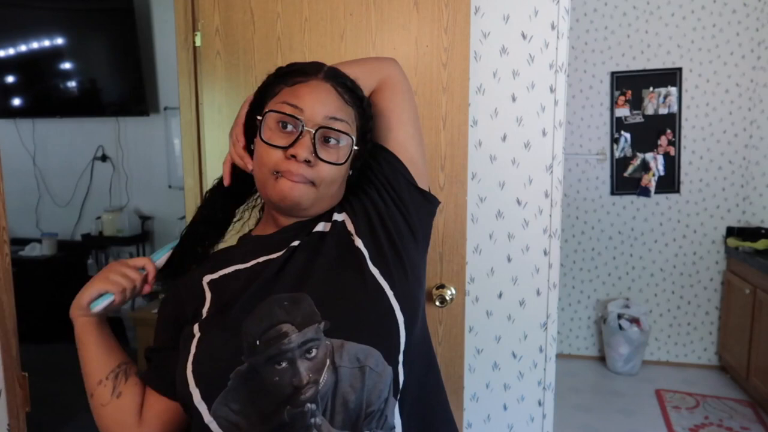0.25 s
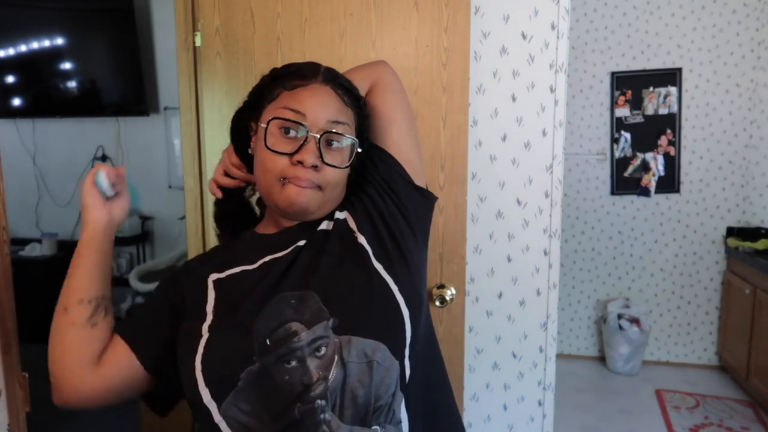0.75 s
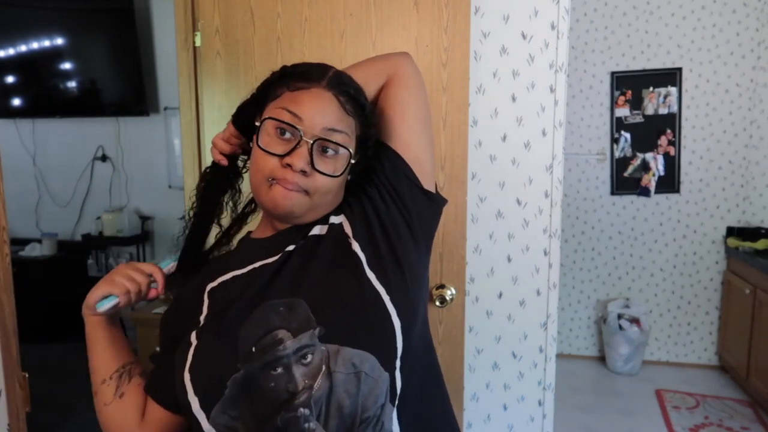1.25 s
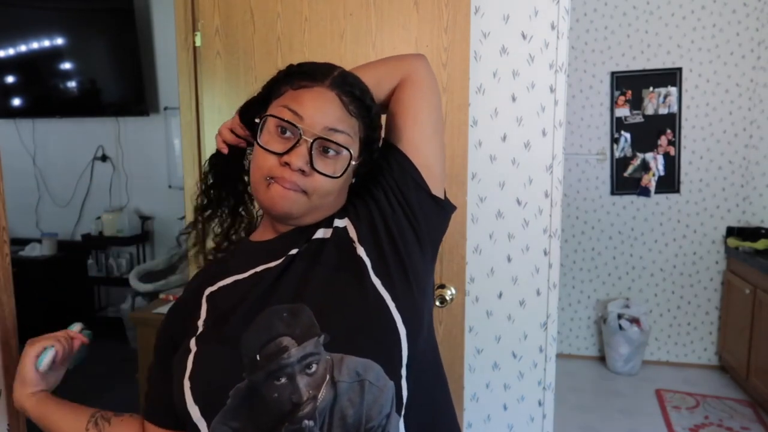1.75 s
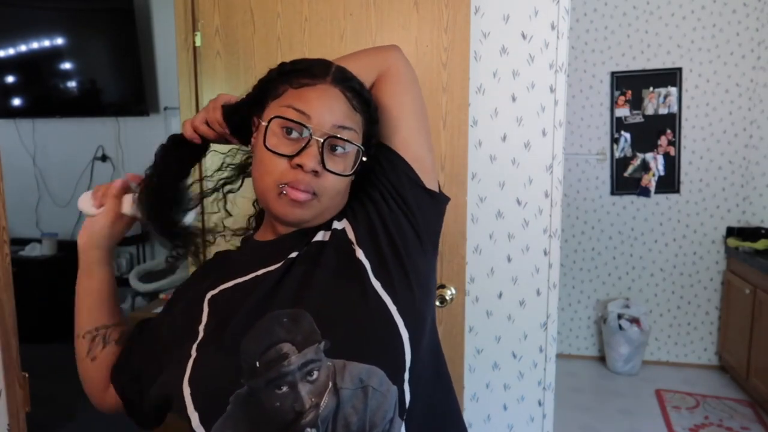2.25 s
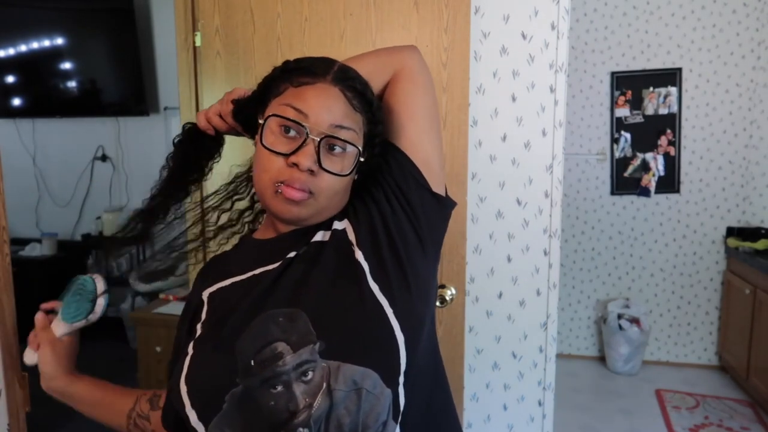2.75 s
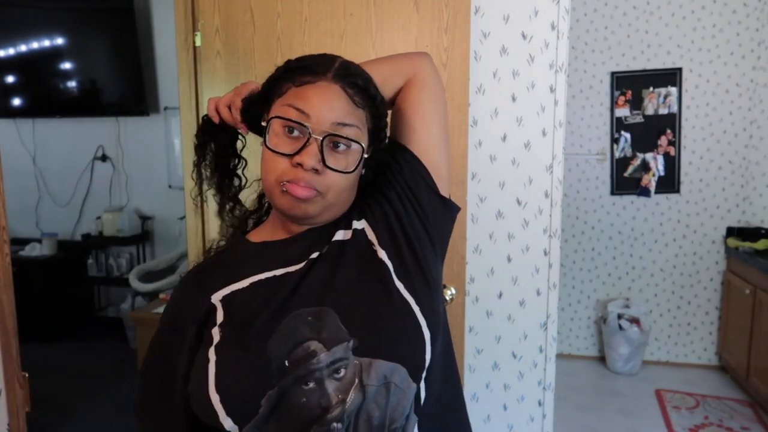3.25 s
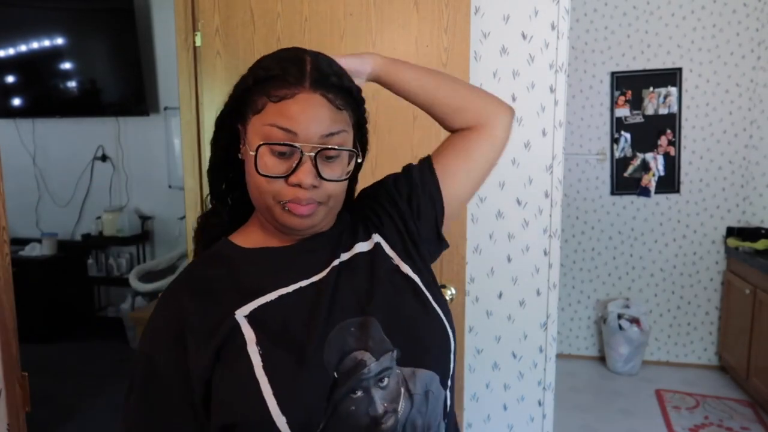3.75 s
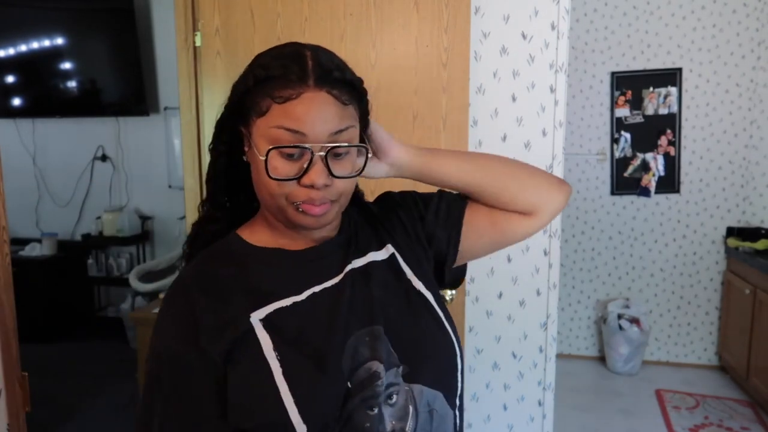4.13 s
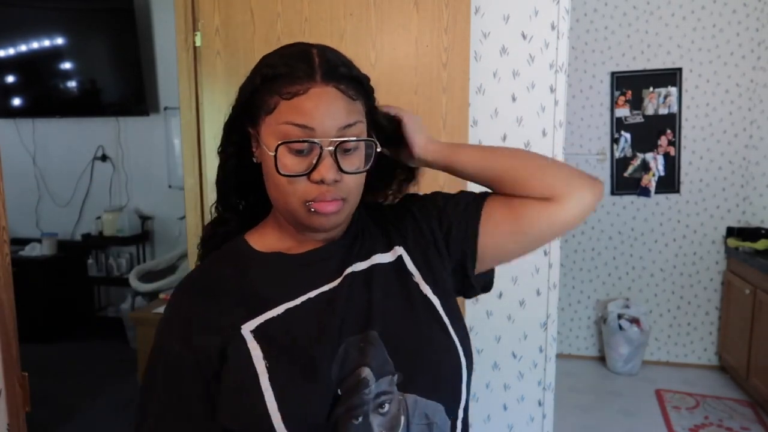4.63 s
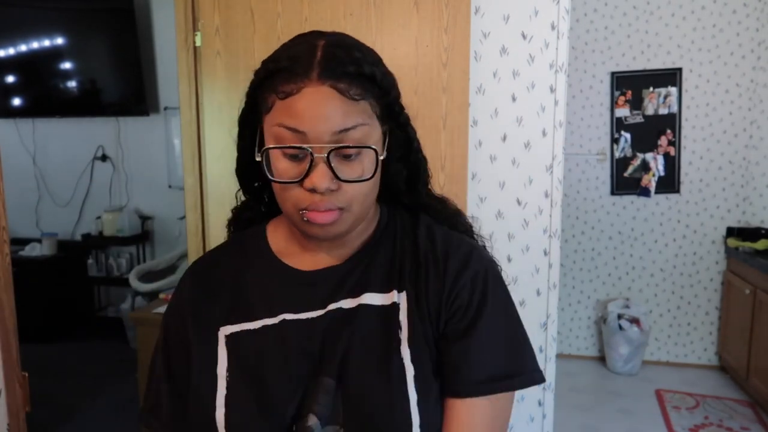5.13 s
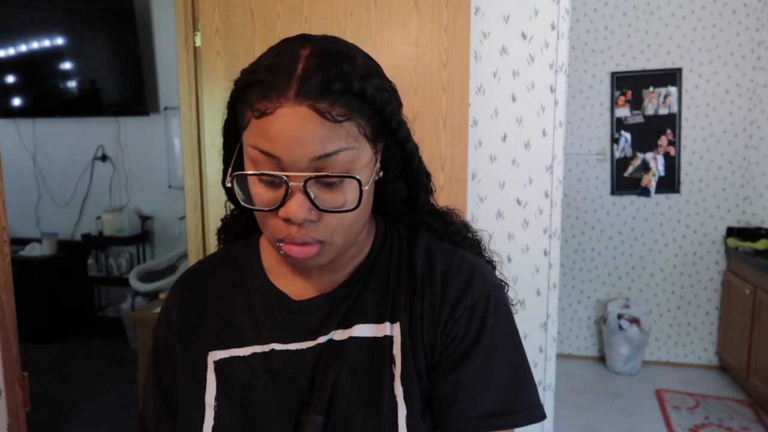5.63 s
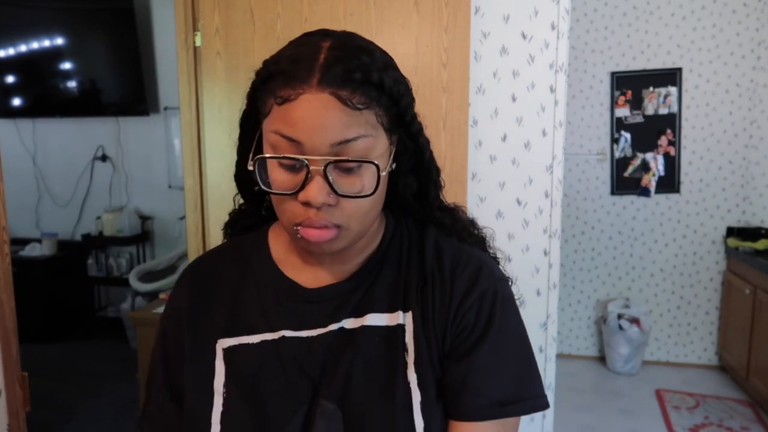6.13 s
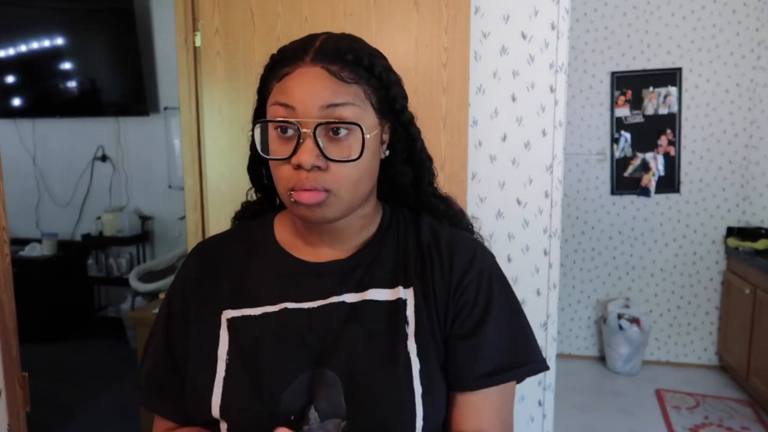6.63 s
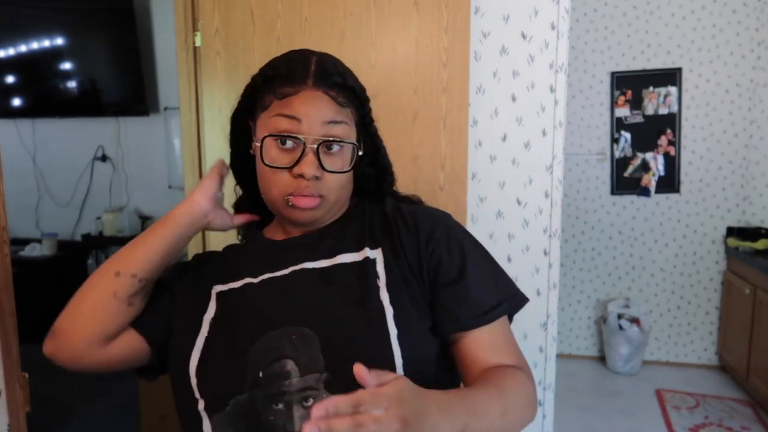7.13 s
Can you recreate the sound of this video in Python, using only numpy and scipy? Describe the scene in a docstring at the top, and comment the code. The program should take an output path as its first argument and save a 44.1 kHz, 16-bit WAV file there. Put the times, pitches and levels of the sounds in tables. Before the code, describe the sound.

Close by in a small home room, a paddle brush makes three scratchy, hollow strokes through long hair, ticking and snagging on tangles. Fingers smooth the hair almost silently, then the brush clacks loudly on a counter. A bottle bumps, sputters out cream, snaps shut and is set down. Palms rub with faint squeaks. A low appliance hum throbs throughout.

```python
"""Hair brushing and a cream bottle.

A paddle brush strokes long hair three times, tugging at tangles (slip noise, bristle pings, ticks); fingers smooth it.
The brush clacks onto a counter (damped modes, noise bursts). A bottle bumps, sputters cream, snaps shut and lands.
Palms rub (slip noise) and squeak (pitch glides). An appliance hums and throbs throughout (beating sines, noise).
"""
import sys
import numpy as np
from scipy import signal
from scipy.fft import rfft, irfft, next_fast_len
from scipy.io import wavfile
from scipy.ndimage import map_coordinates

SR = 44100
rng = np.random.default_rng(int(sys.argv[2]) if len(sys.argv) > 2 else 0)


def output_pcm(signal):
    """Save a mono or channel-first signal as 16-bit PCM at the path in sys.argv[1].

    Samples are clipped to [-1, 1] before scaling.
    """
    pcm = np.clip(np.atleast_2d(signal).T, -1, 1) * 32767
    wavfile.write(sys.argv[1], SR, np.round(pcm).astype(np.int16))


N = 325887

# Table levels are relative; the source functions add trims.
# brush glides down the hair: start_s, length_s, bristle_db, paddle_db
STROKES = [(0, 0.46, -52, -53.5), (.975, 0.71, -51.5, -50.5), (2.325, 0.53, -57, -57)]
# bristles catch in a tangle and tug through it: start_s, length_s, bristle_db, paddle_db
TUGS = [(0, 0.015, -46, -34.5), (.085, 0.095, -47.5, -43.5), (.325, 0.031, -48, -64),
        (.38, 0.019, -43.5, -42.5), (.412, 0.056, -51, -47.5), (.975, .01, -50, -53),
        (1.225, 0.08, -46, -54), (1.345, 0.013, -47, -44), (1.372, 0.043, -44, -45),
        (1.428, 0.061, -48, -44), (2.338, 0.014, -40.5, -46), (2.38, 0.048, -46.5, -37),
        (2.445, 0.058, -48.5, -42.5), (2.66, .006, -55, -65), (2.703, 0.01, -50, -51),
        (2.753, 0.029, -44.5, -40), (2.815, .02, -62, -58)]
# bristles scraping over strands: freq_hz, level_db
BRISTLE_SPECTRUM = [(820, -21), (1400, -8), (1560, -7), (1760, -2), (1940, -4), (2250, -1), (2980, -9.5),
                    (3670, -6), (4560, -11), (6080, -12), (8690, -17), (9410, -17.5), (12500, -17),
                    (14300, -31), (15000, -69)]
# hollow paddle: freq_hz, level_db
PADDLE_SPECTRUM = [(180, -32), (300, -3.5), (327, -9), (376, -12), (438, 3), (536, -3), (671, 4.5),
                   (866, -7), (1070, 0.5), (1390, -11), (1700, -10), (2210, -45), (3740, -120)]
# rise and fall times are per 20 dB; strands thin out toward the ends, tangles loosen
GLIDE_RISE_S, GLIDE_FALL_S, GLIDE_SAG_DB_PER_S = 0.072, 0.069, 10
TUG_RISE_S, TUG_FALL_S, TUG_SAG_DB_PER_S = 0.047, 0.036, 32
# single bristles spring free; spread is a fraction of pitch, level is beside the scrape
PING_HZ, PING_SPREAD, PINGS_PER_S, PING_T60_S, PING_DB = 2874, 0.17, 330, 0.017, -7.5
# small ticks of bristles in the hair, later of bottle and hands: start_s, level_db, pitch_hz, knock_db, knock_hz
TICKS = [(0.321, -46, 3020, -22, 700), (0.365, -38.5, 2820, -1, 983), (0.384, -30, 3020, -11, 1450),
         (0.397, -35, 3400, -8, 1000), (0.97, -46, 2620, -8, 704), (1.219, -41, 2600, -20, 700),
         (1.2846, -35, 1970, -6, 700), (1.3749, -33, 2310, -7, 756), (1.3958, -31, 2930, -12, 705),
         (1.4575, -34.5, 3130, -12, 760), (1.677, -41, 2440, -17, 700), (2.331, -30.5, 2900, -3, 713),
         (2.375, -31, 2430, -3, 980), (2.412, -35, 2700, 5, 1103), (2.4389, -30.5, 2860, -16, 1090),
         (2.6998, -31.5, 2300, -17, 705), (2.75, -33, 2510, 0, 1035), (2.765, -31, 2620, 1.5, 984),
         (2.95, -40.5, 3220, -6, 700), (4.791, -41, 1680, -4, 1130), (5.027, -44, 3230, -7, 960),
         (5.685, -41, 2660, -16, 700), (5.786, -35, 1960, -15, 800), (5.858, -32, 2250, 2, 830),
         (6.527, -46, 2570, -14, 700), (6.544, -41, 2010, -7, 690), (6.8073, -36.5, 2140, -3.5, 690)]
# brush slaps into the hair: start_s, level_db
SLAPS = [(0.001, -28.5), (0.025, -34.5)]
# brush cushion modes: freq_hz, level_db, t60_s
CUSHION_MODES = [(638, -5, 0.21), (770, 2.5, 0.088), (842, 3, 0.082), (996, -11.5, 0.15), (2010, -8, 0.069),
                 (2452, -3.5, 0.058), (2900, -31, 0.034)]
# fingers smooth the hair: start_s, length_s, level_db
SMOOTHING = [(3.2, 0.58, -68.5), (3.99, 0.081, -62), (4.32, .03, -61), (4.795, .03, -63)]
# strands rustling: freq_hz, level_db
STRAND_SPECTRUM = [(500, -14), (1200, -4), (1600, -6), (2150, 7), (2800, -10), (4500, -12), (7000, -24),
                   (12000, -40)]

# brush lands on the counter and settles: start_s, level_db
CLACKS = [(4.4255, -5.5), (4.4371, -20)]
# brush handle modes: freq_hz, level_db, t60_s
HANDLE_MODES = [(326, -27, 0.035), (490, -18, 0.023), (630, -1.5, 0.02), (879, 6, 0.017), (958, 10, 0.02),
                (1203, 2.5, 0.016), (1710, -2, 0.018), (2430, -10, 0.014), (2817, -1, 0.016),
                (3150, -12, 0.014), (3840, -18, 0.025), (4730, -18, 0.012)]
# counter board modes: freq_hz, level_db, t60_s
COUNTER_MODES = [(205, -17, .4), (262, -15, .3), (316, -10, .33), (398, -5, .25), (443, -5, .47),
                 (478, -12, .3), (576, -13, .27), (643, -14, .25), (785, -7, .24), (816, -8, .22),
                 (873, -11, .24), (918, -3.5, .39), (942, -1.5, .34), (981, -6.5, .28), (1014, -4, .26),
                 (1047, -12, .4), (1086, -6, .26), (1176, -13, .24), (1260, -14, .17), (1324, -14, .27),
                 (1782, -22, .3), (2223, -16, .24), (2659, -16, .27), (2825, -12, .22), (2929, -16, .3),
                 (3413, -21, .21), (3779, -22, .16)]
# counter's dense ring: freq_hz, level_db
SHUDDER_SPECTRUM = [(88, -54), (150, -21), (195, -13), (340, -2), (438, -4), (504, -8), (610, -7.5),
                    (704, -8), (933, 0), (1200, -8.5), (1500, -15), (2090, -16), (2410, -18), (2850, -19),
                    (3500, -26), (4300, -35), (5700, -31), (10000, -57), (13000, -101), (22000, -120)]
# thin metal part on the counter is jolted: start_s, level_db
RATTLES = [(4.4255, -43), (4.467, -48), (4.542, -57)]
# metal part modes: freq_hz, level_db, t60_s
METAL_MODES = [(5440, 1, 0.13), (5750, -3, .11), (5722, -8, .09)]
# contact noise of soft surfaces: freq_hz, level_db
SOFT_CONTACT = [(100, -23), (300, 5), (3000, 3.5), (4500, -11), (7000, -16.5), (13000, -30)]
# contact noise of hard surfaces: freq_hz, level_db
HARD_CONTACT = [(100, -24), (500, 2), (1300, 6), (2000, -29), (2700, 1), (4000, -21), (5000, -18),
                (7500, -23), (10000, -32), (15000, -42)]

# bottle bumps about: start_s, level_db, pitch_hz, t60_s
BUMPS = [(5.362, -28.5, 147, 0.19), (5.688, -23, 140, 0.12), (5.759, -20, 130, 0.065),
         (6.083, -31, 149, 0.32)]
# cream spurts at each squeeze: start_s, length_s, gurgle_db, spray_db
SQUEEZES = [(5.69, 0.037, -58, -61), (5.768, 0.013, -44, -70), (5.787, 0.03, -41.5, -69),
            (5.825, .016, -43, -65), (5.859, 0.036, -37.5, -60), (5.904, 0.029, -38.5, -46.5),
            (5.95, 0.023, -58, -65)]
# nozzle gurgle: freq_hz, level_db
NOZZLE_SPECTRUM = [(180, -8), (300, -4.5), (494, 0), (616, -9), (790, -0.5), (928, -8), (1030, -2.5),
                   (1340, -5), (1480, -11), (2110, -1.5), (2270, -6.5), (3850, -28), (10000, -46),
                   (13000, -79), (22000, -120)]
# cap snaps shut in two steps: start_s, level_db
CAP_SNAPS = [(6.012, -33.5), (6.028, -31.5)]
# cap modes: freq_hz, level_db, t60_s
CAP_MODES = [(860, 5.5, 0.017), (1210, 10.5, 0.016), (1940, -4, 0.022), (3210, -4, 0.05), (3120, -16, 0.14),
             (5030, -19.5, 0.038)]
# bottle is set down and rocks: start_s, level_db
SET_DOWN = [(6.083, -24), (6.0979, -34.5)]
# bottle modes: freq_hz, level_db, t60_s
BOTTLE_MODES = [(169, -7, 0.28), (233, 3.5, 0.039), (302.5, -0.5, 0.1), (880, -3, 0.026), (1110, -1, 0.03),
                (1996, 0, 0.019), (2790, 8, 0.01)]

# one palm slides over the other: start_s, length_s, skin_db, hiss_db
RUBS = [(6.55, 0.16, -56, -62), (6.7, 0.028, -56, -54.5), (6.812, 0.0046, -54.5, -63),
        (6.85, 0.095, -55, -63)]
# skin friction, also the cream's spray: freq_hz, level_db
SKIN_SPECTRUM = [(710, -16), (1200, -2), (1500, -10), (1850, -1), (2250, 0.5), (4500, -11), (5850, -40),
                 (9900, -120)]
# hiss of palms, cap and bottle: freq_hz, level_db
HISS_SPECTRUM = [(2060, -5), (3500, -4), (4950, -4.5), (10000, -11.5), (11800, -19), (14500, -22),
                 (15000, -37)]
# damp skin squeaks: start_s, length_s, start_hz, end_hz, level_db
SQUEAKS = [(6.538, 0.01, 2440, 1700, -52), (6.804, 0.013, 1884, 2600, -44),
           (6.816, 0.028, 3370, 3600, -49.5)]

MAINS_HUM_HZ, MAINS_HUM_DB, MOTOR_DB, FIRST_THROB_S = 120.03, -50, -51, 0.034
# motor tone above the mains hum, wandering with its load: time_s, offset_hz
MOTOR_OFFSET = [(0, 2.44), (.62, 1.6), (1.23, 4.03), (1.85, 3.73), (2.47, 3.88), (3.08, 3.78), (3.7, 1.62),
                (4.32, 3.85), (4.93, 4.53), (5.55, 5.4), (6.17, 3.74), (6.78, 3.85), (7.4, 5.15)]
# motor tone level added to MOTOR_DB: time_s, level_db
MOTOR_LEVEL = [(0, 2.5), (1.2, -1), (2.3, -6.5), (2.8, 5), (3.35, -8.5), (4.2, 4.5), (5.2, 5), (5.6, 0.5),
               (7.4, 1.5)]
# steady hum lines, each wavering slowly in level on its own: pitch_hz, level_db
HUM_LINES = [(41.7, -59.5), (57.3, -61.5), (59.3, -54), (83.5, -58), (86, -56.5), (180, -63), (208, -72),
             (227, -68), (298, -64.5), (468, -63.5), (1077, -70.5), (11450, -101)]
HUM_WAVER_DB, HUM_WAVER_KNOTS_PER_S = 3.2, 3.5
# appliance rumble: freq_hz, level_db
RUMBLE_SPECTRUM = [(15, -13), (30, -7), (45, 2.5), (70, -19), (88, 3.5), (105, -4.5), (140, -0.5),
                   (190, -8.5), (300, -74)]
# moving air: freq_hz, level_db
AIR_SPECTRUM = [(82, -24), (140, 0), (151, -24.5), (216, -3.5), (257, -7), (301, -9.5), (404, -10),
                (472, -9), (622, -15.5), (1040, -18.5), (1660, -23.5), (2550, -25), (2930, -26.5),
                (11800, -43.5), (15200, -55)]

# left-right correlation of the gestures and the room: freq_hz, correlation
ALIKE = [(100, 0.95), (300, 1), (900, 0.97), (2800, 0.95), (4500, 0.2), (8000, -0.23), (13000, -0.84)]
# left-right correlation of air and rumble: freq_hz, correlation
AIR_ALIKE = [(60, 0.94), (120, 0.93), (240, 0.56), (470, 0.59), (940, 0.46), (1870, 0.41), (3730, 0.27),
             (7420, 0.031), (14800, -0.16)]
# room decay: freq_hz, t60_s
ROOM_DECAY = [(150, 0.33), (400, 0.44), (1000, 0.27), (3000, 0.29), (6000, 0.26), (12000, 0.077)]
TOP_HZ, PEAK_CEILING = 15050, .93


def amp(db):
    """Decibels to gain."""
    return 10 ** (np.asarray(db) / 20)


def unit(x):
    """Scale to rms 1."""
    return x / np.sqrt(np.mean(x ** 2) + 1e-20)


def along(points, hz):
    """Read (freq_hz, value) points on a log axis."""
    f, v = np.transpose(points)
    return np.interp(np.log(hz + 1), np.log(f + 1), v)


def curve(points):
    """Read (time_s, value) points at every sample."""
    return np.interp(np.arange(N) / SR, *np.transpose(points))


def wobble(knots_per_s):
    """Smooth random curve through normally distributed knots."""
    knots = rng.standard_normal(int(N * knots_per_s / SR) + 4)
    return map_coordinates(knots, [np.arange(N) * knots_per_s / SR])


def filtered(x, response):
    """Multiply the spectrum of x by a response of frequency."""
    n = x.shape[-1]
    m = next_fast_len(n + SR // 2)
    return irfft(rfft(x, m) * response(np.fft.rfftfreq(m, 1 / SR)), m)[..., :n]


def coloured(x, spectrum):
    """Shape x by a spectrum, at rms 1."""
    return unit(filtered(x, lambda hz: amp(along(spectrum, hz))))


def stereo(pair, alike):
    """Mix two unrelated signals to a left-right correlation set per frequency."""
    def mid_side(hz):
        angle = np.arccos(np.clip(along(alike, hz), -1, 1)) / 2
        return np.array([np.cos(angle), np.sin(angle)])

    mid, side = filtered(pair, mid_side)
    return np.array([mid + side, mid - side])


def add(track, start_s, sound):
    """Mix a sound into a track."""
    start = max(round(start_s * SR), 0)
    part = sound[..., :N - start]
    track[..., start:start + part.shape[-1]] += part


def ring(modes, attack_s):
    """Damped modes that swell smoothly over the contact time."""
    t = np.arange(SR // 2) / SR
    swell = 1 - np.exp(-(t / attack_s) ** 2)
    return swell * sum(amp(db - 60 * t / t60) * np.sin(2 * np.pi * hz * t) for hz, db, t60 in modes)


def crack(spectrum, t60_s, attack_s=0.00024):
    """Short stereo burst of contact noise."""
    t = np.arange(SR // 2) / SR
    shape = amp(-60 * t / t60_s) * (1 - np.exp(-(t / attack_s) ** 2))
    return shape * coloured(stereo(rng.standard_normal((2, len(t))), ALIKE), spectrum)


def blows(contacts, modes, attack_s, contact, crack_db, crack_t60_s):
    """Each contact rings the object's modes under a burst of noise."""
    track = np.zeros((2, N))
    for start_s, db in contacts:
        burst = amp(crack_db) * crack(contact, crack_t60_s)
        add(track, start_s, amp(db) * (ring(modes, attack_s) + burst))
    return track


def friction(spectrum, slips_per_s, smooth, clump_limit_db):
    """Tiny slips of uneven size, bunched by a random gain, over smooth hiss; rms 1."""
    slips = (rng.random(N) < slips_per_s / SR) * rng.uniform(-1.27, 1, (2, N))
    clumps = amp(clump_limit_db * np.tanh(wobble(70) / 2))
    force = unit(slips * clumps) + smooth * rng.standard_normal((2, N))
    return coloured(stereo(force, ALIKE), spectrum)


def swells(rows, rise_s, fall_s, sag_db_per_s=0):
    """Gain per level column of gestures that rise, sag and fall; rise and fall times are per 20 dB."""
    t, power = np.arange(N) / SR, 0
    for start_s, length_s, *dbs in rows:
        early = np.maximum(start_s - t, 0)
        late = np.maximum(t - start_s - length_s, 0)
        sag_db = sag_db_per_s * np.clip(t - start_s, 0, length_s)
        shape_db = -20 * (early / rise_s + late / fall_s) - sag_db
        power = power + np.outer(amp(dbs), amp(np.maximum(shape_db, -150))) ** 2
    return np.sqrt(power)


def in_room(x, wet_db, onset_s=0.0045):
    """Sound plus a diffuse noise tail in which each frequency dies at its own speed."""
    hz, t, z = signal.stft(rng.standard_normal((2, SR // 2)), SR, nperseg=256)
    decay = amp(-60 * t / along(ROOM_DECAY, hz)[:, None])
    tail = signal.istft(z * decay, SR, nperseg=256)[1]
    onset = 1 - np.exp(-(np.arange(tail.shape[1]) / SR / onset_s) ** 2)
    tail = stereo(tail, ALIKE) * onset
    wet = signal.fftconvolve(x, tail / np.linalg.norm(tail[0]), axes=1)[:, :N]
    return x + amp(wet_db) * wet


def brushing():
    """Bristles glide through the strands and tug at tangles, shaking the hollow paddle."""
    glides = swells(STROKES, GLIDE_RISE_S, GLIDE_FALL_S, GLIDE_SAG_DB_PER_S)
    tugs = swells(TUGS, TUG_RISE_S, TUG_FALL_S, TUG_SAG_DB_PER_S)
    bristle, paddle = np.hypot(glides, tugs)
    slips = friction(BRISTLE_SPECTRUM, slips_per_s=800, smooth=0.92, clump_limit_db=10)
    scrape = bristle * (amp(-5.0) * slips + amp(PING_DB) * pings())
    shake = friction(PADDLE_SPECTRUM, slips_per_s=700, smooth=0.62, clump_limit_db=1)
    return in_room(scrape + amp(-4.0) * paddle * shake, wet_db=-7.5)


def pings():
    """Dense crackle of springing bristles, each with its own pitch and strength; rms 1."""
    when, detune, size = rng.random((int(PINGS_PER_S * N / SR), 3)).T
    t = np.arange(SR // 50) / SR
    pitch_hz = PING_HZ * (1 + PING_SPREAD * (2 * detune - 1))
    decay = amp(-18 * size[:, None] - 60 * t / PING_T60_S)
    grains = decay * np.sin(2 * np.pi * np.outer(pitch_hz, t))
    places = (when * N).astype(int)[:, None] + np.arange(len(t))
    return unit(np.bincount(places.ravel(), grains.ravel(), N)[:N])


def ticks():
    """Each tick is a narrow noise snap and a ping at its own pitch, with a small lower knock."""
    track = np.zeros((2, N))
    for start_s, db, hz, knock_db, knock_hz in TICKS:
        band = [(hz / 1.7, -22), (hz / 1.6, -8), (hz, 0), (hz * 1.37, -16), (13000, -34)]
        snap = crack(band, t60_s=0.032, attack_s=0.0016)
        ping = ring([(hz, -3, .025)], attack_s=0.00043)
        knock = ring([(knock_hz, 4, .04), (knock_hz * 1.13, -3, .025)], attack_s=0.0012)
        add(track, start_s, amp(db - 4.5) * (snap + ping + amp(knock_db + 1.5) * knock))
    return in_room(track, wet_db=-6.5)


def slap():
    """The brush cushion meets the hair with a hollow pop of damped modes."""
    track = blows(SLAPS, CUSHION_MODES, attack_s=0.0011, contact=SOFT_CONTACT,
                  crack_db=-8.5, crack_t60_s=0.071)
    return in_room(track, wet_db=-3.5)


def fingers():
    """A hand glides softly down the hair, and the strands rustle by friction."""
    rustle = friction(STRAND_SPECTRUM, slips_per_s=1500, smooth=.8, clump_limit_db=6)
    return swells(SMOOTHING, rise_s=0.04, fall_s=.12)[0] * rustle


def clack():
    """The hard handle hits the counter, whose board rings on and shudders; a metal part rattles."""
    track = blows(CLACKS, HANDLE_MODES, attack_s=0.0021, contact=HARD_CONTACT,
                  crack_db=-3.5, crack_t60_s=0.027)
    hit_s = CLACKS[0][0]
    add(track, hit_s, amp(-19.5) * ring(COUNTER_MODES, attack_s=0.019))
    add(track, hit_s, amp(-16) * crack(SHUDDER_SPECTRUM, t60_s=0.28, attack_s=0.003))
    for start_s, db in RATTLES:
        add(track, start_s, amp(db) * ring(METAL_MODES, attack_s=0.005))
    return in_room(track, wet_db=-12.5, onset_s=0.0082)


def bottle():
    """Low modal bumps, cream sputtering by slip noise, the cap, and the bottle landing with a scuff."""
    hits = blows(SET_DOWN, BOTTLE_MODES, attack_s=0.0019, contact=SOFT_CONTACT,
                 crack_db=-7.0, crack_t60_s=0.07)
    hits += blows(CAP_SNAPS, CAP_MODES, attack_s=0.0016, contact=SOFT_CONTACT,
                  crack_db=-9.0, crack_t60_s=0.12)
    add(hits, CAP_SNAPS[-1][0], amp(-46) * crack(HISS_SPECTRUM, t60_s=0.18, attack_s=0.011))
    add(hits, SET_DOWN[-1][0], amp(-41.5) * crack(HISS_SPECTRUM, t60_s=0.12))
    bumps = np.zeros((2, N))
    for start_s, db, hz, t60_s in BUMPS:
        add(bumps, start_s, ring([(hz, db, t60_s)], attack_s=0.0083))
    gurgle, spray = swells(SQUEEZES, rise_s=0.023, fall_s=0.026)
    sputter = gurgle * friction(NOZZLE_SPECTRUM, slips_per_s=2600, smooth=0.55, clump_limit_db=12)
    sputter += spray * friction(SKIN_SPECTRUM, slips_per_s=1800, smooth=0.74, clump_limit_db=6)
    return bumps + in_room(hits, wet_db=-6.0) + in_room(sputter, wet_db=-7.5)


def palms():
    """Creamy palms slide over each other and squeak, as jittery pitch glides, where they stick."""
    skin, hiss = swells(RUBS, rise_s=0.066, fall_s=0.07)
    skin_slips = friction(SKIN_SPECTRUM, slips_per_s=970, smooth=0.83, clump_limit_db=8)
    hiss_slips = friction(HISS_SPECTRUM, slips_per_s=3000, smooth=1.0, clump_limit_db=4)
    rub = amp(-1.5) * skin * skin_slips + amp(3.0) * hiss * hiss_slips
    squeaks = np.zeros((2, N))
    for start_s, length_s, start_hz, end_hz, db in SQUEAKS:
        n = int(length_s * SR)
        pitch_hz = np.linspace(start_hz, end_hz, n) * (1 + 0.056 * wobble(1640)[:n])
        tone = np.sin(2 * np.pi * np.cumsum(pitch_hz) / SR)
        add(squeaks, start_s, amp(db) * np.hanning(n) * tone)
    return rub + in_room(squeaks, wet_db=-14)


def appliance(drift_hz=0.4):
    """The motor's tone beats against the mains hum, among weaker wavering lines, rumble and moving air."""
    def sine(cycles):
        return np.sqrt(2) * np.sin(2 * np.pi * cycles)  # rms 1

    def noise(spectrum):
        return coloured(stereo(rng.standard_normal((2, N)), AIR_ALIKE), spectrum)

    t = np.arange(N) / SR
    beats = np.cumsum(curve(MOTOR_OFFSET)) / SR
    beats -= np.interp(FIRST_THROB_S, t, beats)  # tones in phase here
    mains = amp(MAINS_HUM_DB) * sine(MAINS_HUM_HZ * t)
    motor = amp(MOTOR_DB + curve(MOTOR_LEVEL)) * sine(MAINS_HUM_HZ * t + beats)
    lines = 0
    for hz, db in HUM_LINES:
        waver_db = HUM_WAVER_DB * np.clip(wobble(HUM_WAVER_KNOTS_PER_S), -2, 1)
        cycles = np.cumsum(hz + drift_hz * wobble(3.05)) / SR + rng.random()
        lines = lines + amp(db + waver_db) * sine(cycles)
    rumble = amp(-55.0 + 1.1 * wobble(4.06)) * noise(RUMBLE_SPECTRUM)
    return mains + motor + lines + rumble + amp(-49) * noise(AIR_SPECTRUM)


def scene():
    """Sum of all sources in the room."""
    return brushing() + ticks() + slap() + fingers() + clack() + bottle() + palms() + appliance()


def record(dry):
    """Round off peaks near the ceiling, then cut everything from TOP_HZ up."""
    rounded = dry / (1 + np.abs(dry / PEAK_CEILING) ** 10) ** (1 / 10)
    return filtered(rounded, lambda hz: hz < TOP_HZ)


dry = scene()
out = record(dry)
output_pcm(out)
```